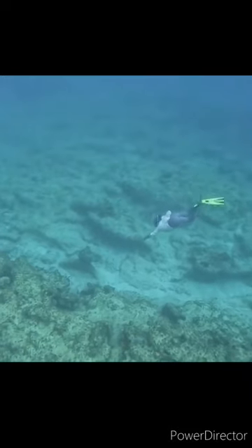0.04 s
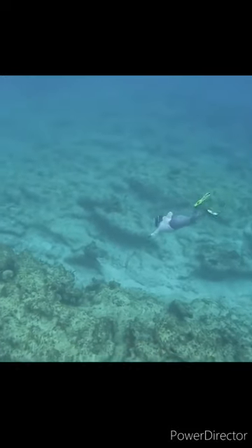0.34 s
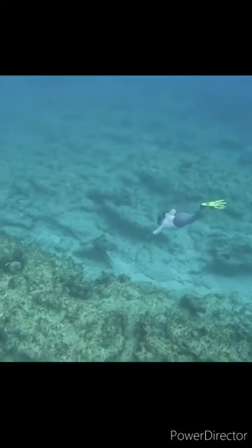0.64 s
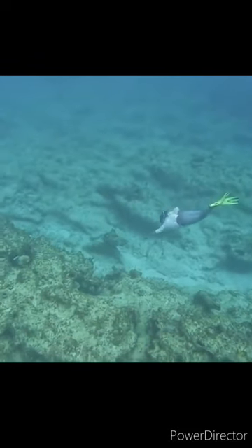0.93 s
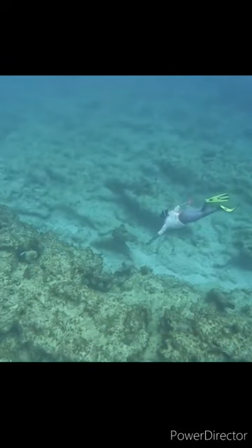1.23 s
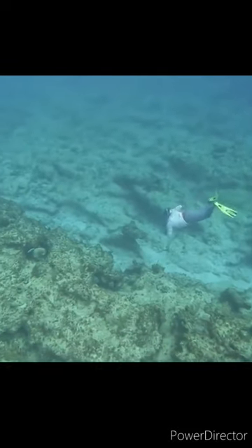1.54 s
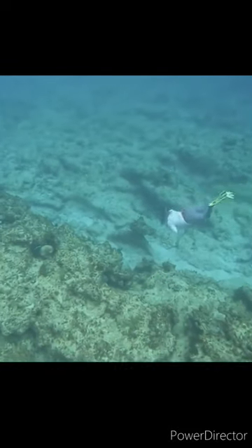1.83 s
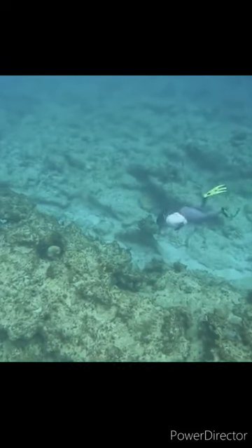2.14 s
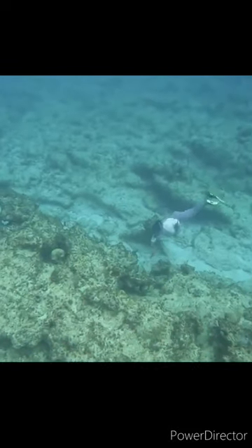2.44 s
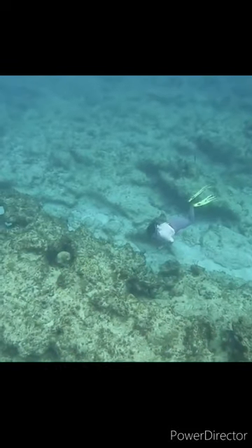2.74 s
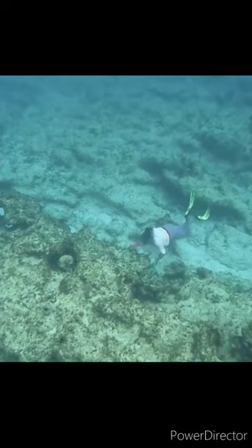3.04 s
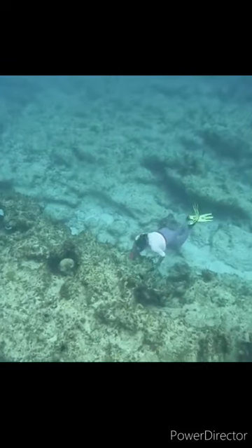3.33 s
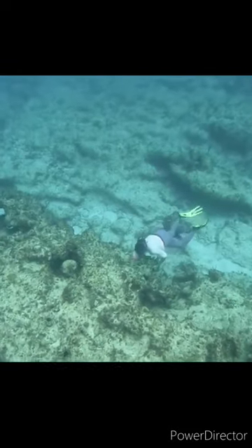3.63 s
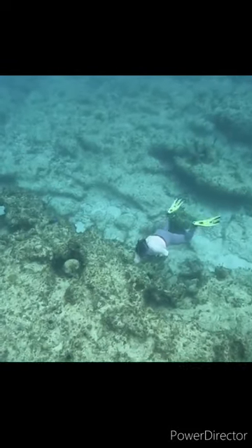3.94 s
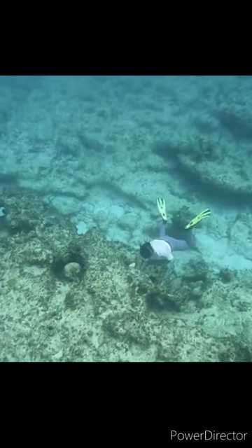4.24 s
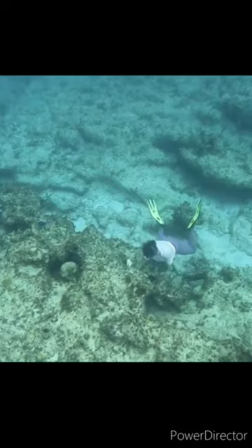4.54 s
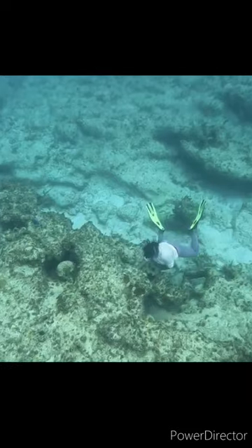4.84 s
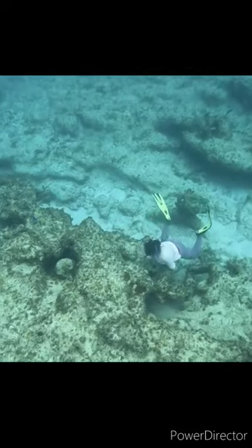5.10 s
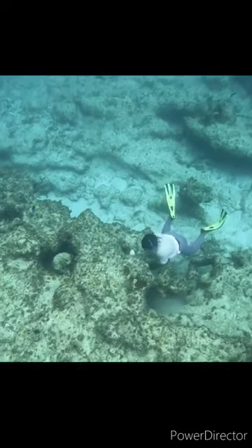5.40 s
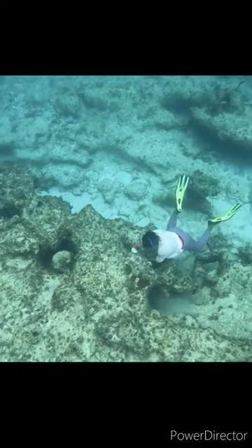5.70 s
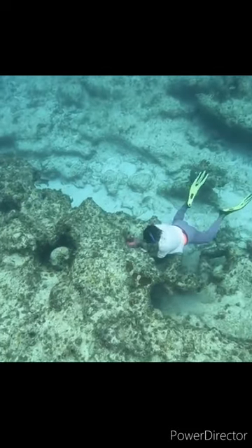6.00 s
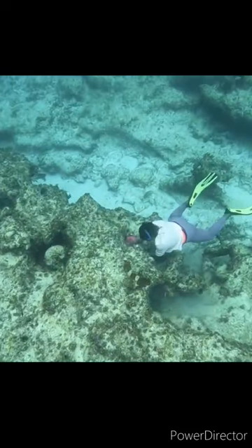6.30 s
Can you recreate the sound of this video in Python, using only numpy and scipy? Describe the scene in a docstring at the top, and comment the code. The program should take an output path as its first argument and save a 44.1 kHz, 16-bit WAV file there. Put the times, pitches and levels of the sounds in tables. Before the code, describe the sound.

Low underwater rumble and wash against a camera case, with knocks, gurgles and crackling shrimp, calming after one hard click.

```python
"""Water rumbles past a hand-held camera's waterproof case and washes through its resonances, while
snapping shrimp crackle all around on the reef. Water pops and glugs against the housing, the swimmer's
grip knocks, gurgles and rubs on it, and the case briefly squeaks and rings. Halfway through comes one
hard click; then the flow calms, the treble dulls and the stereo image narrows to mono."""
import sys
import numpy as np
from scipy import signal
from scipy.fft import rfft, irfft, next_fast_len
from scipy.io import wavfile
from scipy.ndimage import uniform_filter1d, minimum_filter1d, map_coordinates

SR = 44100
rng = np.random.default_rng(int(sys.argv[2]) if len(sys.argv) > 2 else 0)


def inscribe(sig):
    """Save sig as 16-bit PCM at rate SR to the path in sys.argv[1].

    A 1-D sig is mono; a 2-D sig holds one channel per row.
    Samples are clipped to [-1, 1] before scaling.
    """
    pcm = np.round(np.clip(np.atleast_2d(sig).T, -1, 1) * 32767)
    wavfile.write(sys.argv[1], SR, pcm.astype(np.int16))


N = 284886
TIME = np.arange(N) / SR
CALMING_S, DULLING_S, NARROWING_S = (3.31, 3.57), (3.15, 3.85), (3.31, 3.75)


def amp(db):
    """Decibels to gain."""
    return 10 ** (np.asarray(db) / 20)


def unit(x):
    """Scale to rms 1."""
    return x / np.sqrt(np.mean(x ** 2) + 1e-20)


def along(points, hz):
    """Read a curve of (frequency, value) points on a log axis."""
    knots_hz, values = np.transpose(points)
    return np.interp(np.log(hz + 1), np.log(knots_hz + 1), values)


def wobble(rate):
    """A smooth random curve with rate knots a second."""
    return map_coordinates(rng.standard_normal(int(N * rate / SR) + 4), [TIME * rate])


def filtered(x, response):
    """x through a response given as a function of frequency."""
    n = x.shape[-1]
    padded = 2 * next_fast_len(n // 2 + 1500)
    return irfft(rfft(x, padded) * response(np.fft.rfftfreq(padded, 1 / SR)), padded)[..., :n]


def coloured(x, spectrum):
    """x through a minimum-phase EQ with the given curve."""
    def response(hz):
        cepstrum = irfft(np.log(amp(along(spectrum, hz))))
        cepstrum[1:len(hz) - 1] *= 2
        cepstrum[len(hz):] = 0
        return np.exp(rfft(cepstrum))
    return filtered(x, response)


def grains(size, rate, spread_db):
    """Two rows of sparse random impulses, a few much larger than the rest."""
    present = rng.random((2, size)) < rate / SR
    strength = amp(spread_db * np.minimum(rng.exponential(size=(2, size)), 4))
    return present * strength * rng.choice([-1, 1], (2, size))


def add(track, s, sound):
    """Mix a sound into the track at time s."""
    start = max(round(s * SR), 0)
    track[:, start:start + sound.shape[-1]] += sound[..., :N - start]


def lasting(x, db, length):
    """Give each row the energy of a sound of that level and length."""
    return amp(db) * x * np.sqrt(length * SR / (np.sum(x ** 2, axis=-1, keepdims=True) + 1e-20))


def openness(s=TIME):
    """Crossfade: 1 while the image is wide, 0 once it has narrowed."""
    return np.interp(s, NARROWING_S, [1, 0])


# Sub-heavy tone of water on the case: (frequency [Hz], level [dB])
RUMBLE_EQ = [(10, -24), (22, 6.5), (35, -4), (60, -6), (90, -13), (140, -18.5), (220, -29), (400, -42),
             (800, -77)]

def flow(moving_db=-20.5, ease_db_per_s=0.95, calm_db=-34, surge_db=2.0, pop_db=-16):
    """Eddies buffet the case in surges as the swimmer moves; some collapse on it with a soft pop."""
    eddies = unit(coloured(rng.standard_normal((2, N)), RUMBLE_EQ))
    envelope = np.sqrt(np.abs(uniform_filter1d(eddies ** 2, size=7000, axis=1)) + 1e-3)
    pop_eq = [(30, -23), (110, -0.5), (300, -9.5), (550, -26), (1200, -30), (3000, -71)]
    pops = unit(coloured(grains(N, rate=16, spread_db=5.5), pop_eq))
    calm = np.interp(TIME, CALMING_S, [0, 1])
    level_db = (1 - calm) * (moving_db - ease_db_per_s * TIME) + calm * calm_db
    return amp(level_db + surge_db * wobble(8.8)) * (eddies / envelope + amp(pop_db) * pops)


def far_shrimp_db(start_db=-49, drop_db=14, fade_db_per_s=1):
    """Fader for fizz and crackle: it holds, drops as the treble dulls, then sinks slowly."""
    dulled = np.interp(TIME, DULLING_S, [0, 1])
    return start_db - drop_db * dulled - fade_db_per_s * np.maximum(TIME - DULLING_S[1], 0)


# Tone of the wash when wide and when calm, and of its fizz: (frequency [Hz], level [dB])
WASH_WIDE_EQ = [(120, -13.5), (300, 5.5), (390, -1), (480, 9.5), (640, -7), (810, 6), (1050, -14.5),
                (1500, -0.5), (1800, -1.5), (2400, -15), (3300, -11), (4200, -18), (6000, -47.5)]
WASH_CALM_EQ = [(120, -17), (300, -3), (520, 8.5), (660, -1.5), (860, 11.5), (1120, -6.5), (1350, -0.5),
                (1550, -4), (1770, 2.5), (2150, -10), (3200, -10.5), (3480, -13.5), (3900, -17),
                (7000, -34), (14000, -39)]
FIZZ_EQ = [(3000, -33), (4250, -3), (5200, 5), (6200, 1.5), (7500, -2.5), (8800, -3.5), (9600, -8),
           (10500, -10), (11700, -24), (15000, -48)]
# Fader ride on the wash: (time [s], level [dB])
WASH_RIDE = [(0.6, -40), (0.92, -43), (2.14, -38.5), (2.52, -43.5), (4.34, -49), (5.54, -46.5),
             (6.2, -44.5)]

def wash(wide_db=1.5, calm_db=1, fizz_trim_db=-9.5):
    """Countless far snaps and bubbles merge into a bed, coloured by the case, with fizz on top."""
    def patter(eq, rate, spread_db):
        ticks = unit(grains(N, rate, spread_db))
        return unit(coloured(ticks + 0.75 * rng.standard_normal((2, N)), eq))
    wide = amp(wide_db) * patter(WASH_WIDE_EQ, rate=1500, spread_db=2.5)
    calm = amp(calm_db) * patter(WASH_CALM_EQ, rate=1600, spread_db=1.5)
    ride_db = np.interp(TIME, *np.transpose(WASH_RIDE)) + 1.44 * wobble(9.8)
    bed = amp(ride_db) * (openness() * wide + (1 - openness()) * calm)
    fizz = amp(far_shrimp_db() + fizz_trim_db) * patter(FIZZ_EQ, rate=1000, spread_db=4)
    return bed + fizz


# Tone of every shrimp snap, mid-distance or near: (frequency [Hz], level [dB])
SNAP_EQ = [(1200, -39.5), (2500, 2), (4200, 1.5), (5600, -1), (8500, -9), (10500, -15.5), (12500, -27),
           (15000, -29)]

def shrimp_crackle(rate=70, smear_t60=0.18, trim_db=-2, wide_trim_db=-2.7):
    """Shrimp at middle distance snap at random, each with a smear of echoes; distance dulls them."""
    t = np.arange(SR // 20) / SR
    snaps = grains(N, rate, spread_db=4.5)
    echo_power = amp(-120 * t / smear_t60)[None]
    smear = np.sqrt(np.abs(signal.fftconvolve(snaps ** 2, echo_power)[:, :N]))
    bright = coloured(snaps + 0.45 * smear * rng.standard_normal((2, N)), SNAP_EQ)
    distant = coloured(bright, [(7000, -7), (12000, -10)])
    return amp(far_shrimp_db() + trim_db + wide_trim_db * openness()) * unit(distant)


# Foreground snaps; the smaller the bubble, the higher it sounds: (time [s], level [dB], centre [Hz])
SNAP_CUES = [(0.2928, -38.5, 5800), (0.395, -36.5, 8400), (0.4672, -26, 5400), (0.8549, -28.5, 6910),
             (1.0432, -28.5, 6440), (1.2114, -35, 5170), (2.1353, -35.5, 8860), (2.2027, -32.5, 5610),
             (2.5364, -32.5, 7040), (2.5394, -30, 5950), (2.6105, -30, 8620), (2.6195, -35, 8000),
             (2.936, -38, 8420), (3.146, -33, 5170), (3.164, -42, 8000), (3.46, -41, 5960),
             (3.586, -43, 6200), (3.742, -47, 5500), (3.8014, -49, 5000), (4.0723, -48, 6000),
             (4.3171, -36.5, 6540), (4.566, -38, 5700), (4.574, -50, 7000), (5.195, -50, 4770),
             (5.6067, -43.5, 4800), (5.7016, -52, 6500), (5.774, -55, 6000), (5.8152, -47, 5500),
             (6.0074, -48, 6000), (6.1126, -50, 5500), (6.135, -43, 7400), (6.403, -43, 5570)]

def near_shrimp(trim_db=-5, scatter_t60=0.024, scatter_db=-14, flank_db=-7, echo_s=0.0033, echo_db=-11):
    """A bubble collapses: a spike, brief scatter from the rock, an inverted echo off the surface."""
    out, t = np.zeros((2, N)), np.arange(SR // 20) / SR
    for s, db, hz in SNAP_CUES:
        burst = amp(scatter_db - 60 * t / scatter_t60) * rng.standard_normal((2, len(t)))
        burst[:, 0] += 1  # the spike
        bubble = coloured(burst, [(hz / 2, flank_db), (hz, 0), (hz * 2, flank_db / 2)])
        snap = lasting(coloured(bubble, SNAP_EQ), db + trim_db, length=0.0031)
        add(out, s, snap)
        add(out, s + echo_s * np.exp(0.31 * rng.standard_normal()), -amp(echo_db) * snap)
    return out


def resonate(x, modes, tuning=1):
    """Ring a bank of housing modes; little gets out below the lowest or above the highest."""
    low, high = modes[0][0], modes[-1][0]
    def response(hz):
        f = hz / tuning
        ring = sum((-1) ** k * amp(db) * 1j * f * width / (centre ** 2 - f ** 2 + 1j * f * width)
                   for k, (centre, width, db) in enumerate(modes))
        highpass = (1j * hz / (1j * hz + low / 2)) ** 2
        lowpass = 1 / (1 + 1j * hz / high - (hz / (2.6 * high)) ** 2)
        return ring * highpass * lowpass
    return filtered(x, response)


# The housing's four mode banks, low to high: (frequency [Hz], width [Hz], level [dB])
BODY_MODES = [(122.6, 31.4, 0.5), (212.2, 33.6, 3), (314, 98, 1.5), (396, 127, 2), (462.7, 161, -3.5)]
SHELL_MODES = [(677, 20, 5.5), (849.5, 45, 15)]
LID_MODES = [(1495, 73, 6.5), (1620, 54, -0.5), (1781, 49, 10), (2104, 210, 0.5)]
SCRATCH_MODES = [(2570, 1270, 7.3), (3370, 480, 16.8), (4600, 1200, 2.7), (5800, 44, 9.1)]
# The housing rings slightly higher in the calm: (time [s], tuning [ratio])
HOUSING_TUNING = [(2.9, 0.964), (4.0, 1.005)]
# Sends to thump, body, shell, lid and scratch: (when wide [dB], when calm [dB], hardness share [ratio])
KNOCK_SENDS = [(-3.5, -0.5, -0.12), (-2.5, -5, 0.039), (-13, -6, 0.86), (-17.5, -20.5, 1.2),
               (-26, -29.5, 1.31)]
# Knocks, short rubs and soft low pops of water on the case. Hardness runs from soft (below 0) to sharp,
# hollowness from rim (below 0) to mid-wall:
# (time [s], length [s], thump [Hz], level [dB], hardness [dB], hollowness [dB])
KNOCK_CUES = [(0.347, 0.0057, 253, -28, -14, -12), (0.626, 0.0037, 151, -20, -19, -10),
              (0.981, 0.01, 278, -18, -17, -17), (1.121, 0.019, 530, -42.5, 27.5, 0),
              (1.256, 0.0077, 320, -16, 1.5, 2.5), (1.263, 0.015, 274.4, -5.5, -8.5, -0.5),
              (1.437, 0.0083, 158, -14, -1, 6), (1.448, 0.017, 155, -25.5, -20, -11),
              (1.496, 0.026, 250, -28, -9, 9), (1.626, 0.031, 289, -25, 4.5, -1),
              (1.726, 0.083, 204.5, -26, -2, -3), (1.778, 0.013, 210, -19.5, -1.5, 4.5),
              (1.826, 0.017, 265, -20, -5, -12), (1.839, 0.012, 333, -23, 2.5, -1),
              (1.867, 0.012, 220, -19.5, 1, -18), (1.947, 0.013, 238, -18.5, 0.5, -6.5),
              (1.996, 0.0094, 347, -28, 7.5, 3.5), (2.004, 0.011, 411, -15, -14, 13.5),
              (2.061, 0.02, 289, -22, -2, 6), (2.127, 0.022, 169, -23, -1, 0),
              (2.205, 0.02, 193, -15.5, -5, -8), (2.222, 0.02, 291, -15.5, -4.5, 3.5),
              (2.245, 0.061, 296, -23.5, -4.5, -5), (2.278, 0.023, 298, -16, -2, 9.5),
              (2.346, 0.055, 179, -24, -2, -0.5), (2.495, 0.023, 233, -27, -13, -9),
              (2.538, 0.015, 347, -22.5, 5.5, -7), (2.591, 0.0046, 219, -24.5, 8.5, -0.5),
              (2.598, 0.025, 214, -15, -8.5, -1), (2.71, 0.02, 196.4, -15.5, -10, -17),
              (2.732, 0.024, 191, -24.5, 1, 1), (2.837, 0.011, 295, -25.5, -4.5, 4),
              (2.886, 0.015, 202, -23.5, -24, -17), (3.107, 0.03, 186, -18, -6, -2.5),
              (3.138, 0.005, 203, -15.5, 0, 0), (3.283, 0.021, 206, -23.5, -2.5, 3.5),
              (3.35, 0.033, 177, -39.5, 12, 10), (3.36, 0.0062, 200, -14.5, -18, 4),
              (3.375, 0.044, 181, -29.5, 8, 3.5), (3.41, 0.032, 193, -24, 3, 4.5),
              (3.439, 0.042, 202, -29.5, 3, -10), (3.534, 0.079, 209, -30.5, -5, 0.5),
              (3.714, 0.026, 194, -24, -5, -0.5), (3.741, 0.024, 334, -23.5, 0.5, -3),
              (3.755, 0.027, 200, -22, -5.5, -1), (3.93, 0.024, 215, -31, 1.5, -4),
              (4.064, 0.076, 209, -30, 1, -4), (4.285, 0.029, 312, -36, 8.5, 3),
              (4.313, 0.02, 210, -32, 14, -2), (4.361, 0.026, 301, -31, -10.5, 9.5),
              (4.559, 0.011, 303, -25.5, -2, 1.5), (4.5655, 0.014, 316, -31, 10, -1),
              (4.601, 0.022, 241, -37, 11.5, -3.5), (4.747, 0.0051, 383, -30.5, 0, -5),
              (4.891, 0.025, 292, -33, 3, 1), (4.914, 0.03, 319, -27.5, -4, 4.5),
              (5.303, 0.029, 274, -28.5, -5.5, 12), (5.325, 0.027, 309, -37.5, 3, 5),
              (5.372, 0.0071, 310, -34.5, -8, -13), (5.476, 0.0092, 302, -33, -16, -20),
              (5.773, 0.017, 286, -39.5, -27, -10), (5.888, 0.011, 312.6, -33.5, 8.5, 8),
              (5.91, 0.013, 300, -35, 13.5, -10), (5.932, 0.018, 295, -37.5, 10, -8),
              (6.21, 0.018, 320, -36.5, -5, 3), (6.235, 0.029, 322, -29.5, -6.5, 11),
              (6.343, 0.022, 235, -37, -0.5, 11), (6.363, 0.0064, 201, -26.5, 0, -1.5)]

def knocks_and_pops(grit_rate=1100, hiss=0.34, detune=0.031, touch=0.5):
    """The hand or the water bumps the case: the push thumps low, fine grit rings the housing's modes."""
    out, t = np.zeros((2, N)), np.arange(SR // 7) / SR
    wide_db, calm_db, share = np.transpose(KNOCK_SENDS)
    push = t / 0.00012 * np.exp(1 - t / 0.00014)
    first_touch = np.roll(push / push.sum(), SR // 400)  # one dull pulse in the attack
    for s, length, hz, level_db, hardness_db, hollow_db in KNOCK_CUES:
        # harder contact sends more to the high modes
        sends_db = calm_db + (wide_db - calm_db) * openness(s) + share * hardness_db
        thump_db, body_db, shell_db, lid_db, scratch_db = level_db + sends_db
        age = t / max(length, 0.005)
        pressure = age ** 0.47 * np.exp(-2.6 * age)
        grit = unit(grains(len(t), grit_rate, spread_db=-0.5))
        texture = pressure * (grit + hiss * rng.standard_normal((2, len(t))))
        contact = texture + touch * np.linalg.norm(texture[0]) * first_touch
        thump = age * np.exp(-2.7 * age) * np.sin(2 * np.pi * hz * t)
        knock = lasting(thump, thump_db, length)
        for modes, db in [(BODY_MODES, body_db), (SHELL_MODES, shell_db + hollow_db),
                          (LID_MODES, lid_db), (SCRATCH_MODES, scratch_db)]:
            # each contact loads the case differently and shifts its modes a little
            tuning = np.interp(s, *np.transpose(HOUSING_TUNING)) * np.exp(detune * rng.standard_normal())
            knock = knock + lasting(resonate(contact, modes, tuning), db, length)
        add(out, s, knock)
    return out


# Sub hits from large eddies: (time [s], level [dB])
GLUG_CUES = [(0.843, -16), (1.711, -12), (2.432, -16.5), (2.6, -20), (2.807, -18.5), (2.867, -19.5),
             (3.074, -20), (3.11, -17.5)]

def glugs(hz=39, length=0.031):
    """A large eddy swings the pressure on the case once or twice."""
    out, t = np.zeros((1, N)), np.arange(SR // 5) / SR
    swing = t * np.exp(-2 * (t / length) ** 2) * np.sin(2 * np.pi * hz * t)
    for s, db in GLUG_CUES:
        add(out, s, lasting(swing, db, length))
    return out


# Bursts of small bubbles: (time [s], length [s], centre [Hz], level [dB])
GURGLE_CUES = [(1.123, 0.014, 2010, -34.5), (1.262, 0.02, 1700, -34), (1.838, 0.012, 2180, -39),
               (2.281, 0.008, 2400, -37), (3.365, 0.045, 1565, -39), (3.409, 0.022, 1790, -32.5),
               (3.741, 0.015, 2900, -49), (3.926, 0.035, 2050, -47.5), (3.932, 0.014, 493, -29.5),
               (4.064, 0.052, 1520, -45), (4.314, 0.016, 1300, -31.5), (4.9, 0.045, 1300, -43),
               (5.89, 0.03, 3200, -45.5), (5.923, 0.03, 2460, -49), (6.216, 0.023, 2300, -46.5),
               (6.347, 0.024, 1320, -44)]

def gurgles(bubbles_per_s=1100, pitch_spread=0.29, decay_cycles=2.6, rise=0.022, scatter_db=4.5):
    """Water squeezes out from under the hand; each bubble rings a few cycles and rises in pitch."""
    out, t = np.zeros((1, N)), np.arange(SR // 8) / SR
    order = np.arange(60)[:, None]
    for s, length, centre_hz, db in GURGLE_CUES:
        jitter, pitch, strength = rng.standard_normal((3, 60, 1))
        place = np.abs(order + 0.5 * jitter) / (bubbles_per_s * length)  # 0 to 1 across the burst
        hz = centre_hz * np.exp(pitch_spread * np.clip(pitch, -2, 2))
        cycles = hz * np.maximum(t - length * place, 0)
        age = np.minimum(cycles / decay_cycles, 20)
        rings = np.sin(2 * np.pi * cycles * (1 + rise * age)) * np.exp(-age)
        gains = (place < 1) * amp(scatter_db * strength) * np.exp(-place / 2)
        add(out, s, lasting(np.sum(gains * rings, axis=0), db, length))
    return out


# The hand shifts its hold: (time [s], length [s], level [dB])
GRIP_CUES = [(1.677, 0.72, -34), (3.384, 0.72, -40), (4.742, 0.044, -40.5), (5.38, 0.16, -46.5),
             (6.195, 0.071, -36.5)]

def grip_rub(rest_db=-51.5, ramp_s=0.45):
    """Small creeping slips keep the case muttering faintly, swelling whenever the hand shifts."""
    effort = amp(rest_db)
    for s, length, db in GRIP_CUES:
        inside_s = np.minimum(TIME - s, s + length - TIME)
        effort = effort + amp(db) * np.clip(1 + inside_s / ramp_s, 0, 1) ** 2
    slips = grains(N, rate=380, spread_db=1.5) * amp(5.2 * wobble(22))
    sends = [(BODY_MODES, 0), (SHELL_MODES, -16), (LID_MODES, -20)]
    return effort * sum(amp(db) * unit(resonate(slips, modes)) for modes, db in sends)


# Short squeaks and ringing tones of the case:
# (time [s], length [s], start pitch [Hz], end pitch [Hz], level [dB])
TONE_CUES = [(1.625, 0.042, 1795, 1790, -36), (2.115, 0.045, 622, 736, -33.5),
             (2.591, 0.024, 962, 963, -25), (3.367, 0.026, 1680, 1810, -28.5),
             (3.41, 0.018, 1504, 1570, -25), (4.905, 0.039, 633, 750, -32),
             (4.916, 0.038, 1575, 1600, -40.5), (4.951, 0.085, 2330, 2240, -55),
             (5.306, 0.041, 1440, 1290, -44), (5.318, 0.043, 864, 860, -40),
             (5.578, 0.015, 1340, 1340, -45), (5.887, 0.015, 1444, 1430, -35.5),
             (5.888, 0.023, 2870, 2830, -44)]

def squeaks_and_rings(waver=0.0062, flutter_db=4):
    """Now and then the case squeaks or rings on: a short, unsteady tone that holds or glides."""
    out = np.zeros((1, N))
    for s, length, start_hz, end_hz, db in TONE_CUES:
        n = int(length * SR)
        progress = np.linspace(0, 1, n)
        hz = (start_hz + (end_hz - start_hz) * progress) * (1 + waver * wobble(230)[:n])
        swell = np.sqrt(np.abs(np.sin(np.pi * progress))) * amp(flutter_db * wobble(232)[:n])
        tone = np.sin(2 * np.pi * np.cumsum(hz) / SR)
        add(out, s, amp(db) * unit(swell * tone))
    return out


def case_click(at_s=3.1938, gain_db=5, crack_s=0.00016):
    """A hard dry click over full scale: a tiny crack, then one swing of the case wall."""
    out, t = np.zeros((2, N)), np.arange(SR // 40) / SR
    crack = 1.44 * (1 - t / crack_s) * np.exp(-t / crack_s)
    def port(hz, decay_s, crack_gain):
        return np.cos(2 * np.pi * hz * t) * np.exp(-t / decay_s) + crack_gain * crack
    # the left and right ports catch it differently
    pair = np.array([port(180, 0.0025, crack_gain=-2.2), port(230, 0.0011, crack_gain=0.1)])
    add(out, at_s, amp(gain_db) * coloured(pair, [(3500, 0.5), (6500, -9.5), (9000, -24)]))
    return out


# Peaks and notches of the wall when wide and when calm: (centre [Hz], width [Hz], gain [dB])
WALL_WIDE_BANDS = [(666, 55, -2.5), (1023, 56, -8), (1808, 36, 3.5), (2125, 64, -3.5), (2830, 57, -4.5),
                   (3900, 1100, -8.5), (5250, 220, 2.5), (6460, 170, -3.5), (8540, 410, 5.5)]
WALL_CALM_BANDS = [(1020, 81, -9.5), (1192, 31, -22), (1720, 46, 5), (1836, 96, -7), (3150, 150, -6),
                   (3500, 81, 8.5), (5280, 220, -8.5), (6330, 220, 0.5), (7300, 220, 4)]

def case_wall(x):
    """The wall favours or blocks narrow bands; its colour crossfades as the image narrows."""
    hz = np.geomspace(300, 14000, 600)
    def through(bands):
        gain_db = sum(db * np.exp(-((hz - centre) / width) ** 2) for centre, width, db in bands)
        return coloured(x, np.transpose([hz, gain_db]))
    return openness() * through(WALL_WIDE_BANDS) + (1 - openness()) * through(WALL_CALM_BANDS)


# Stereo width: (frequency [Hz], side gain [dB])
STEREO_WIDTH = [(40, -12), (130, -19), (300, -29.5), (500, -14.5), (800, -4.5), (1700, -10.5), (3200, -1),
                (6000, -16), (12000, -10)]
# Stereo balance: (frequency [Hz], left minus right [dB])
STEREO_LEAN = [(60, -4), (160, 0.5), (1700, -1), (3200, 3.5), (5500, -0.5)]

def scene():
    """Mix the layers as mid and side through the wall, decode to left and right, then add the click."""
    beds = flow() + wash() + shrimp_crackle()
    spots = near_shrimp() + knocks_and_pops() + glugs() + gurgles() + grip_rub() + squeaks_and_rings()
    mid, spread = case_wall(beds + spots)
    side = filtered(spread, lambda hz: amp(along(STEREO_WIDTH, hz)))
    pair = np.array([mid + side, mid - side])
    panned = filtered(pair, lambda hz: amp(np.outer([0.5, -0.5], along(STEREO_LEAN, hz))))
    return panned + case_click()


def limiter(x, release_db_per_s=60):
    """Peaks over full scale pull the gain down at once; it creeps back afterwards."""
    over_db = 20 * np.log10(np.maximum(np.abs(x).max(axis=0), 1))
    held_db = -minimum_filter1d(-over_db, size=65)
    reduction_db = uniform_filter1d(held_db, size=33)
    release_db = release_db_per_s * TIME
    return x * amp(release_db - np.maximum.accumulate(reduction_db + release_db))


def record(dry, top_hz=14800):
    """The camera folds to mono halfway through, limits the peaks and loses the highest treble."""
    mono = dry.mean(axis=0)
    narrowed = mono + openness() * (dry - mono)
    rolloff = [(12000, -1), (14500, -16)]
    return filtered(limiter(narrowed), lambda hz: amp(along(rolloff, hz)) * (hz < top_hz))


dry = scene()
out = record(dry)
inscribe(out)
```